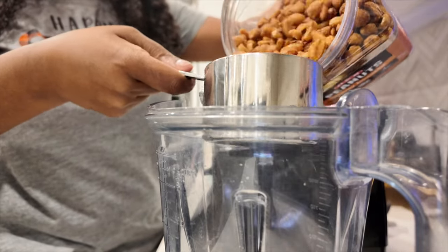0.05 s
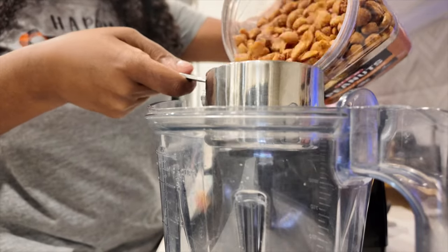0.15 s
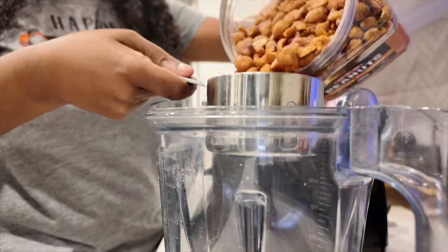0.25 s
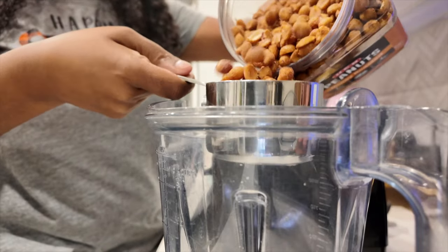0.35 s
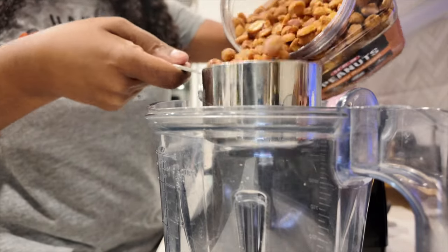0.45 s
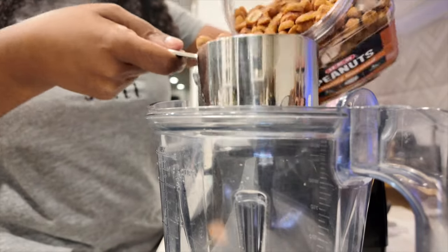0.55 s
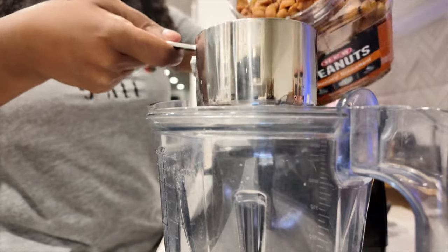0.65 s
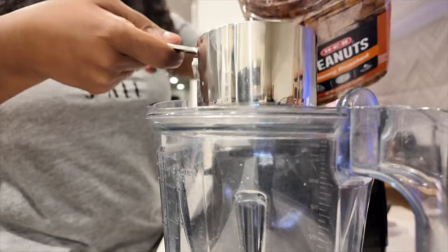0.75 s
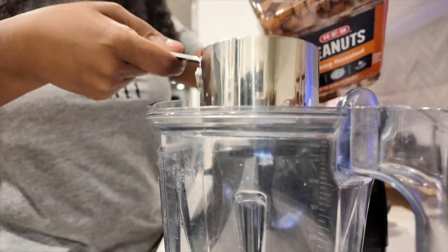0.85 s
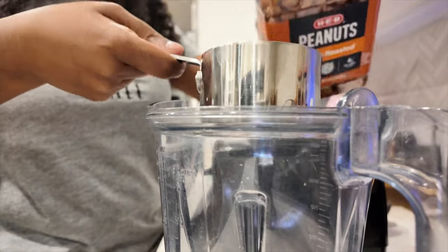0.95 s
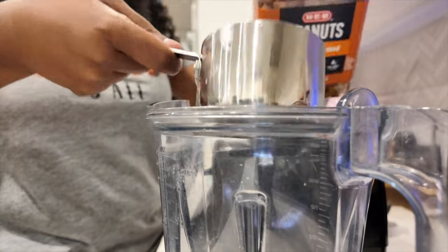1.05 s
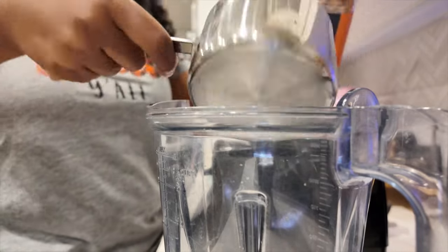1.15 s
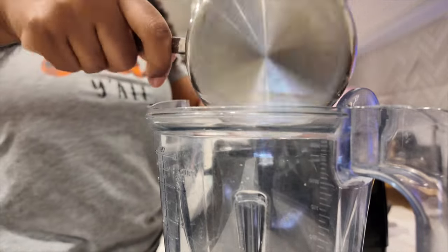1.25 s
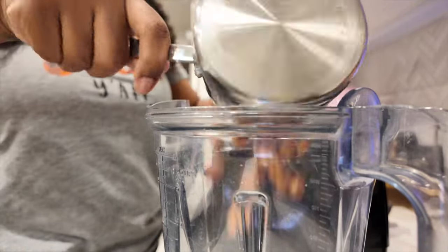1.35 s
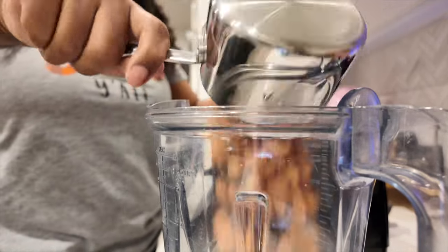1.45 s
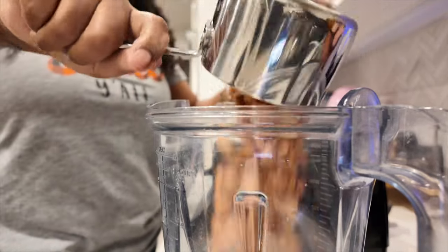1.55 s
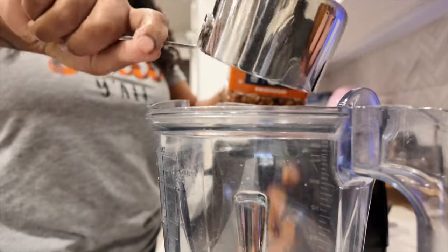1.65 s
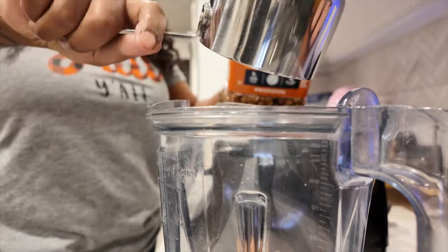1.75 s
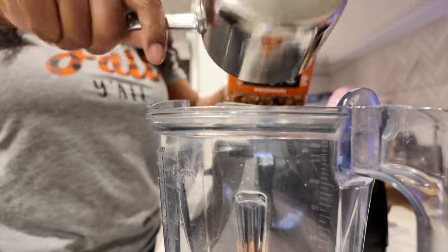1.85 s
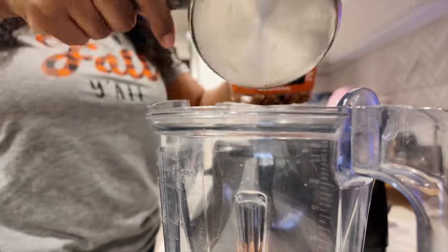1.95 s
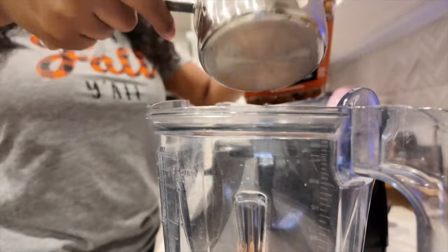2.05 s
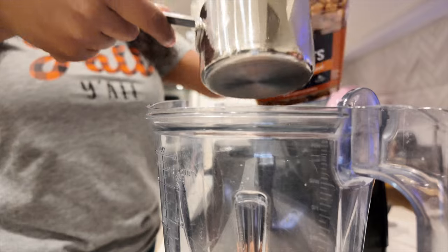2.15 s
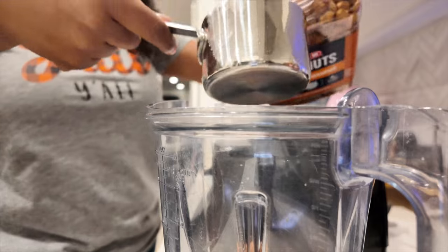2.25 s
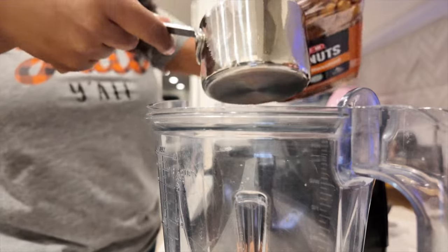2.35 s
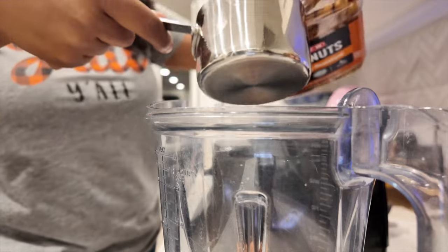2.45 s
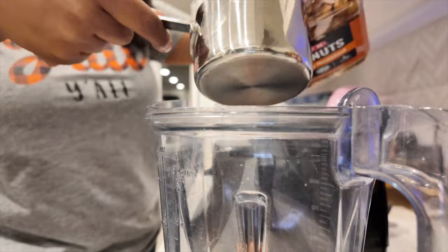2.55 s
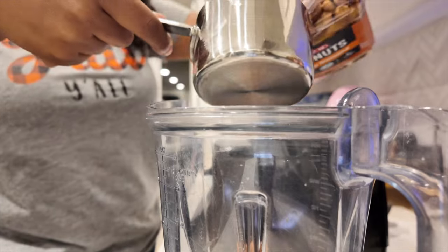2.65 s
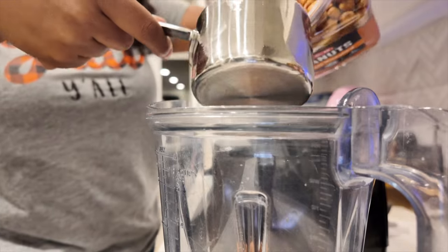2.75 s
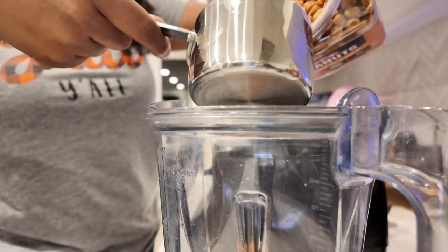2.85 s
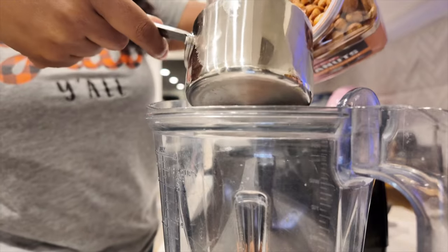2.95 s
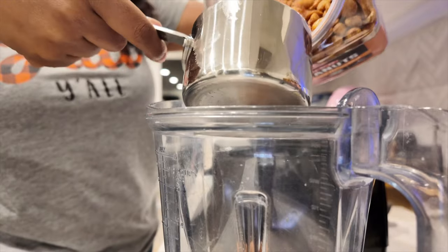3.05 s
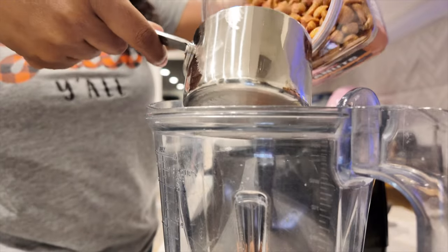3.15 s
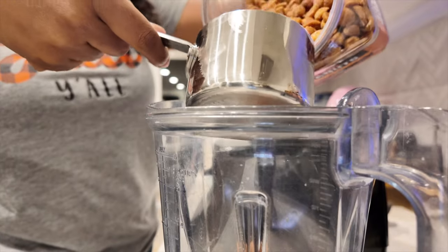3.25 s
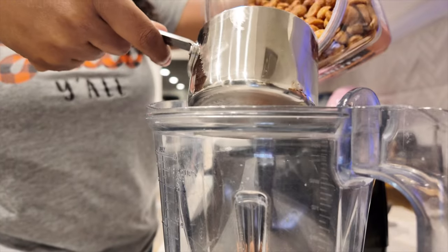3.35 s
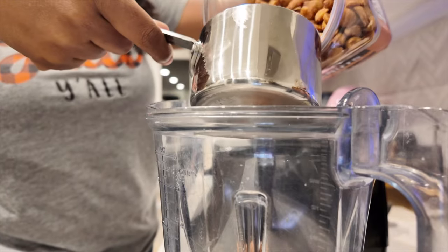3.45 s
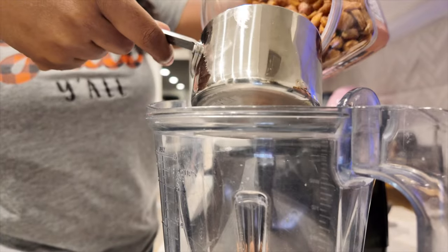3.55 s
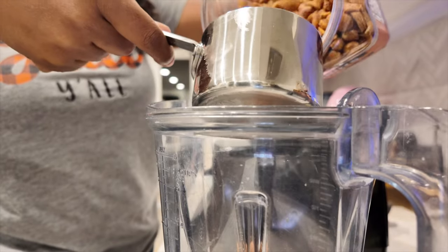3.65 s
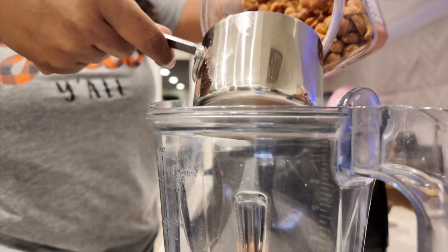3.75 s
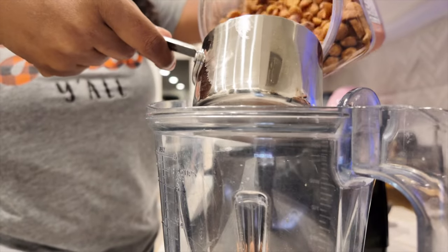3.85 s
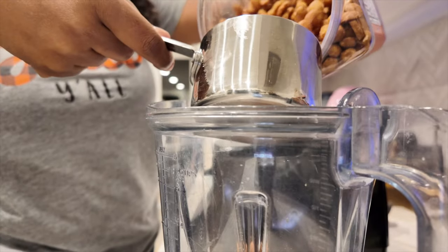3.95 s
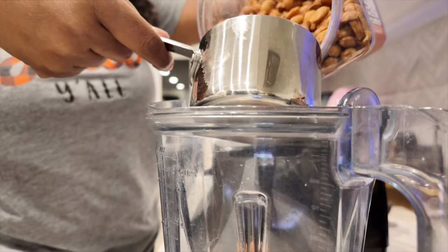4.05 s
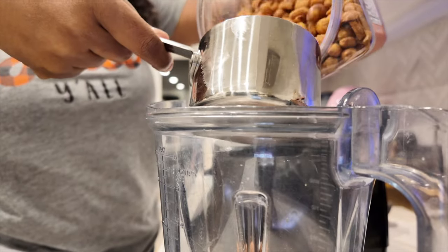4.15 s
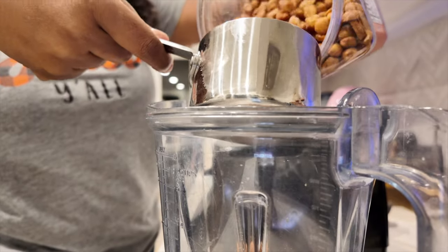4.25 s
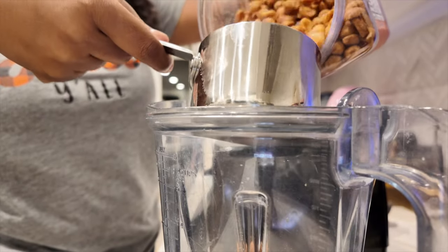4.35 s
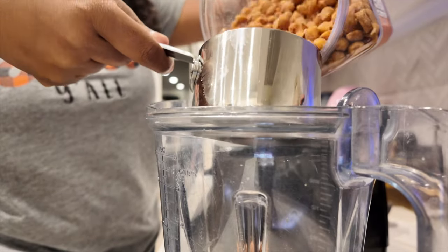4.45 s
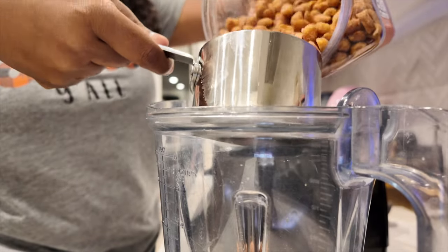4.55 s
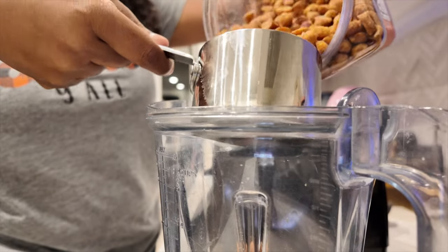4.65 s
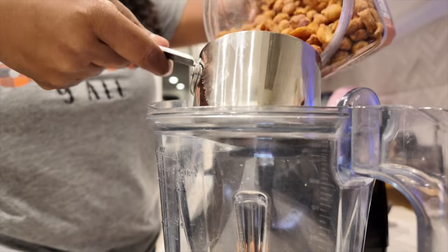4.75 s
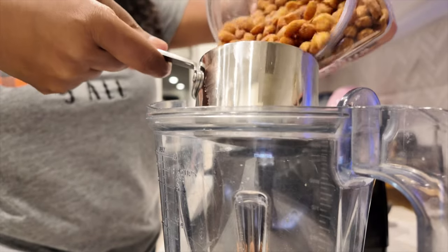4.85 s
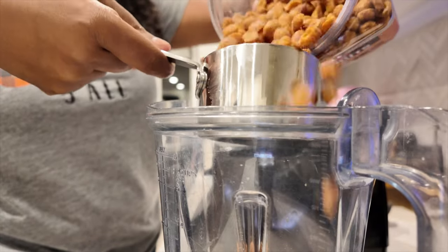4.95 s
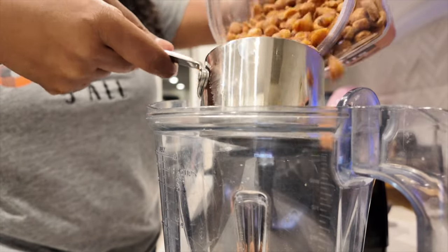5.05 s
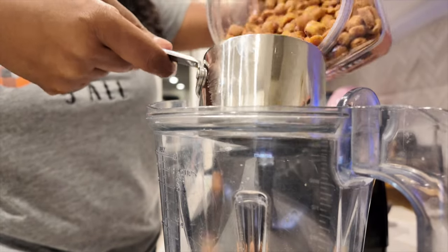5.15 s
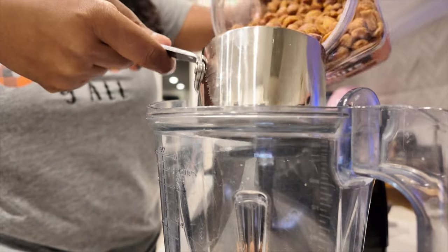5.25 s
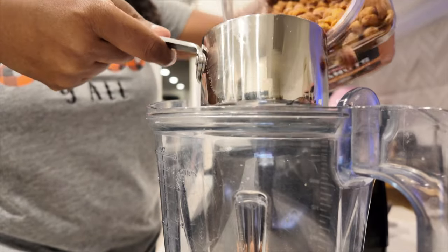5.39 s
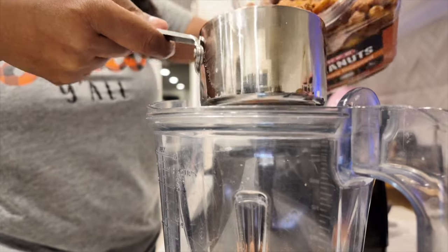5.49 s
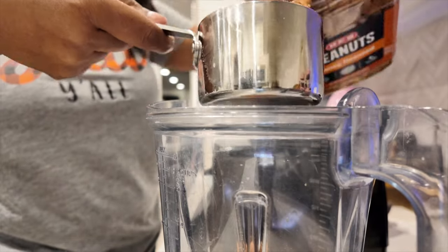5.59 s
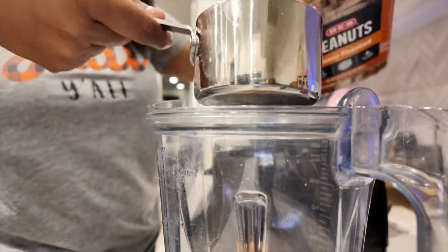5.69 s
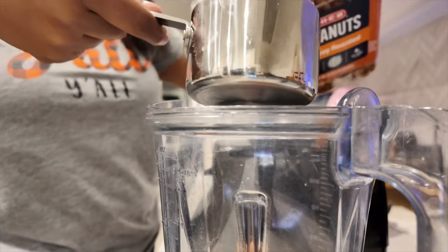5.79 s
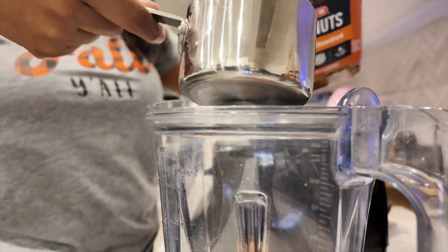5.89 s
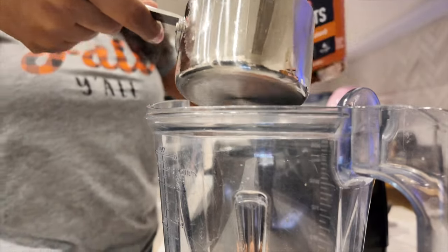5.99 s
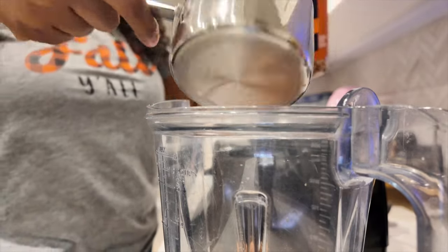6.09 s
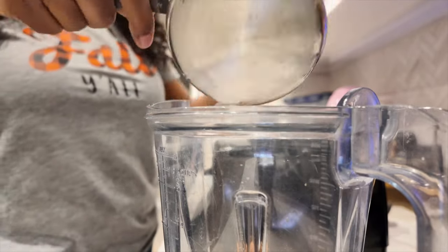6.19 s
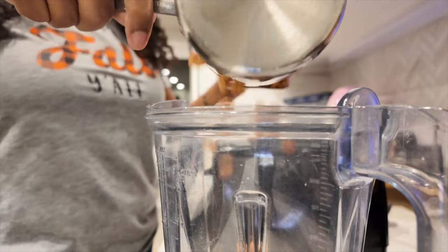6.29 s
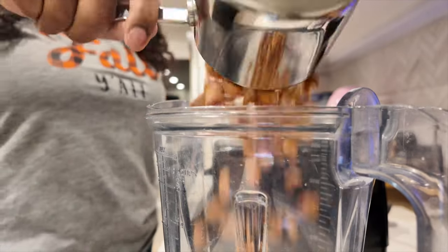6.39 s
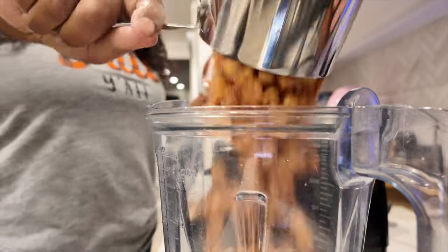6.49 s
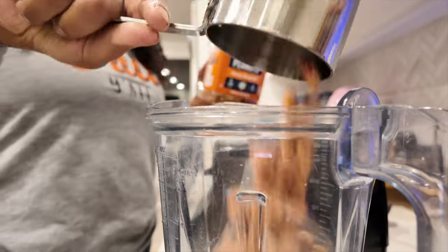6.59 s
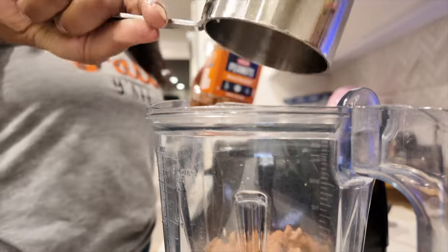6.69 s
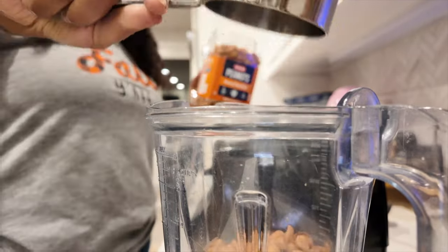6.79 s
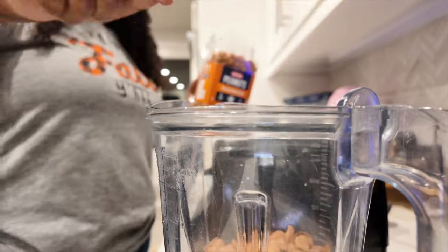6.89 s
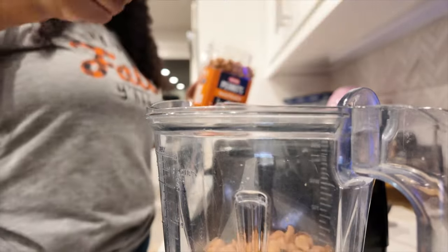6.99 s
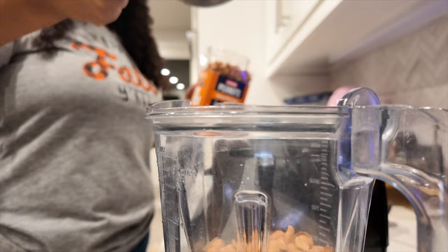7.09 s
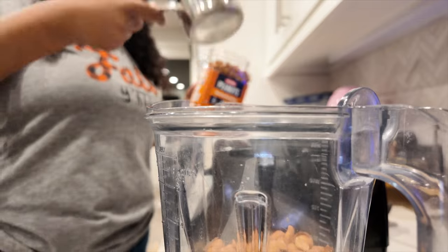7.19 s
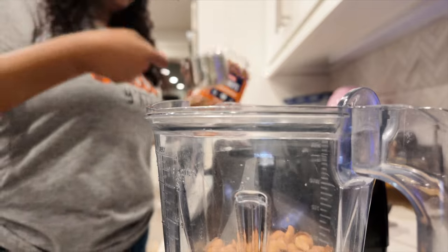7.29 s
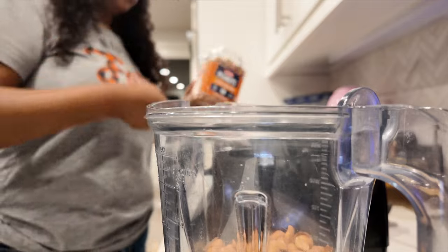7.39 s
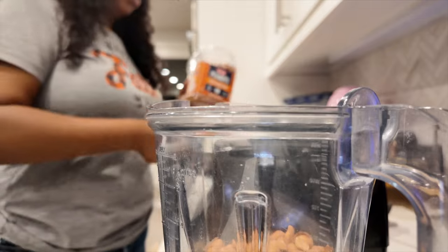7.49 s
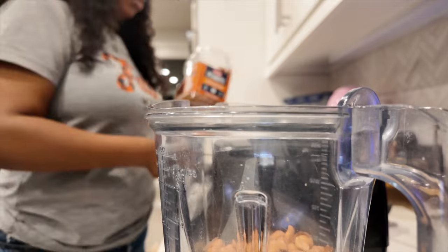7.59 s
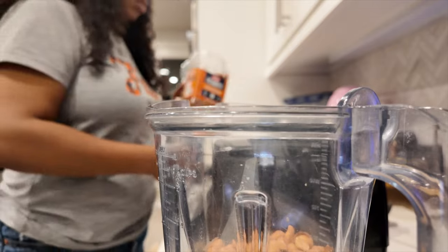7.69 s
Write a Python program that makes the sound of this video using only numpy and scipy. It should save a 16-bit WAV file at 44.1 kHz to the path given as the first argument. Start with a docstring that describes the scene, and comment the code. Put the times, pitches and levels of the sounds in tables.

```python
"""Peanuts rustle as they slide in a plastic tub and a steel cup, close to the microphones in a kitchen.
Stray nuts crack into a plastic blender jar, and two cupfuls clatter down through the jar's resonances.
Between them the cup is filled again: its first nuts ring it like a bell, then the load damps it.
At the end the tub is moved and its nuts shift. Contacts are noise bursts and decaying modes;
streams are random showers of such contacts, with their body and treble levelled separately."""
import sys
import numpy as np
from scipy import signal
from scipy.fft import rfft, irfft
from scipy.io import wavfile

SR = 44100
rng = np.random.default_rng(int(sys.argv[2]) if len(sys.argv) > 2 else 0)


def materialize(psi):
    """Save the field psi as 16-bit PCM at rate SR to the path in sys.argv[1].

    A 1-D psi becomes a single channel; in a 2-D psi each row is a channel.
    """
    bounded = np.clip(np.atleast_2d(psi).T, -1, 1)
    quanta = np.round(bounded * 32767).astype(np.int16)
    wavfile.write(sys.argv[1], SR, quanta)


N = 340893

# Event levels are set ahead of panning, the room and the microphone's rounding.
# Long run of nuts from tub to cup [t/s, level/dB before the slides' body and treble offsets]
FILL_FLOW = [(2.62, -70.5), (2.84, -56.5), (3.32, -50.5), (3.86, -49), (4.12, -43), (4.62, -47),
             (4.76, -51.5), (5.25, -45), (5.45, -65)]
# Short shakes of tub or full cup [start t/s, crest t/s, level/dB before the slides' offsets]
SHAKES_OF_NUTS = [(-0.4, 0.069, -46.5), (0.23, 0.326, -45.5), (0.393, 0.437, -47), (0.516, 0.694, -54),
                  (1.002, 1.142, -58.5), (5.523, 5.68, -55), (5.728, 5.839, -59.5)]
# Single nuts hitting the jar, alone or standing out of a cupful
# [t/s, peak level/dB, treble against body/dB, ring of the spot hit f/Hz]
JAR_DROPS = [(0.18, -14.5, -5.5, 1316), (0.222, -28.5, -32, 668), (0.283, -23.5, -21, 1240),
             (0.564, -19.5, -1.5, 2160), (1.484, -20, 1, 1720), (1.562, -7, -26, 1020),
             (1.623, -5, -5.5, 663), (1.666, -5.5, -5.5, 540), (1.708, -7, -7, 1080), (1.776, -13, 6, 1100),
             (1.786, -3, -14.5, 1003), (1.827, -13, -9.5, 1120), (1.92, -25, -21, 1100),
             (5.066, -15, -4, 700), (5.129, -12.5, -3.5, 1400), (5.153, -16.5, -11, 1320),
             (5.193, -16, -14, 1040), (5.25, -17.5, -9, 1680), (5.273, -17, -6, 1686),
             (5.571, -26.5, -31, 1020), (5.608, -12, -9.5, 1750), (5.919, -20.5, -4.5, 1150),
             (5.936, -19.5, -15, 676), (6.427, -8.5, -1.5, 660), (6.442, -12, -23, 508),
             (6.485, -12, -8, 1760), (6.588, -7, -3.5, 1107), (6.637, -3, -23, 1073), (6.68, -5, -5, 520),
             (6.731, -10.5, -3.5, 670)]
# Times when the cup is heaped and nuts rub its rim [from t/s, to t/s]
HEAPED_SPANS = [(0.28, 2.5), (4.781, 5.7)]
# Nuts skidding along the wall of the full cup
# [start t/s, length of the swell t/s (cut off after 1/3 s), level/dB, wall mode f/Hz]
WALL_SKIDS = [(1.349, 0.36, -38.5, 5720), (6.181, 0.21, -56, 5800), (6.474, 0.15, -33, 5750)]
# Knocks on the full cup [t/s, peak level/dB, wall mode f/Hz]
CUP_KNOCKS = [(0.4801, -16, 5970), (1.263, -31.5, 5700), (1.408, -17.5, 5680)]
# Dry clicks of nuts, cup and tub touching [t/s, peak level/dB, pitch f/Hz]
DRY_CLICKS = [(0.67, -13, 4100), (0.677, -13.5, 5500), (2.307, -25.5, 1093), (2.613, -42, 2200),
              (2.75, -33.5, 2040), (3.272, -15.5, 3740), (3.842, -23.5, 1980), (3.894, -25, 1250),
              (3.948, -27, 1320), (4.002, -22.5, 1850), (4.298, -21.5, 1360), (4.402, -22, 1265),
              (4.552, -27, 1140), (4.588, -25, 1680), (4.681, -24.5, 1170), (4.93, -24.5, 3900),
              (5.522, -28.5, 1310), (5.552, -31, 1460), (5.692, -28, 1230), (5.992, -32.5, 1160),
              (7.253, -44.5, 803.6), (7.535, -33, 1150)]
# Dull bumps of cup and tub being handled [t/s, peak level/dB, pitch f/Hz]
HANDLING_BUMPS = [(1.29, -30.5, 69.5), (1.384, -14, 297), (1.402, -14.5, 290), (1.429, -20, 146.4),
                  (2.303, -26.5, 197.6)]
# Cupfuls tipped into the jar [cup starts to tip t/s, first nuts land t/s, jar floor covered t/s,
# thickest flow t/s, body level/dB, treble level/dB, jar ring against crack/dB]
CUPFULS = [(1.223, 1.473, 1.567, 1.663, -16, -15, 4), (6.199, 6.504, 6.647, 6.67, -16.5, -19.5, 0.5)]
# Nuts landing on the wall of the filling cup [t/s, level/dB, hardness of the contact/dB]
WALL_PINGS = [(2.931, -23, -1.5), (3.0227, -15.5, -2.5), (3.0734, -13.5, -3.5), (3.1307, -9.5, -0.5),
              (3.1981, -12, -1), (3.254, -12.5, 1), (3.3871, -11, -6.5), (3.5079, -18, -0.5),
              (3.55, -23, 6.5), (3.678, -26.5, -6.5), (4.036, -23, -1), (4.16, -26, 9), (4.312, -23.5, 1.5)]
# Nuts shifting in the tub as it is moved [t/s, level/dB]
TUB_SHIFT = [(7.39, -75), (7.42, -55), (7.54, -30.5), (7.624, -38), (7.74, -36)]
# The load landing against the tub's side, so that its hollow booms [t/s, peak level/dB]
TUB_BOOMS = [(7.541, -33.5), (7.66, -40)]

# Modes of the empty steel cup [f/Hz, relative level/dB, t60/s, left minus right/dB]
CUP_MODES = [(2137, 1.5, 0.42, 2.5), (4162, -4, 0.38, -7.5), (6746, 6.5, 0.18, -5), (8110, -11, 0.85, 0),
             (9960, -4, 0.15, -5.5), (11740, -9, 0.18, -3), (14030, -20.5, 0.19, -3)]
# The cup's flat floor, which only clacks [f/Hz, width/Hz, relative level/dB]
CUP_FLOOR_MODES = [(1720, 170, -2.5), (2730, 53, -7)]
# The same cup damped by its load [f/Hz, width/Hz, relative level/dB]
FULL_CUP_MODES = [(4230, 70, 1), (8160, 70, 1), (10000, 120, -7), (12000, 150, -7)]
# Plastic blender jar [f/Hz, width/Hz, relative level/dB]
JAR_MODES = [(153, 3.6, -17), (509, 25, 0.5), (674.3, 23.7, 5), (804, 33, -4.5), (1010, 11, -1.5),
             (1114, 52, 5), (1257, 39, -6.5), (1764, 34, 1.5), (2776, 25, -13), (3530, 85, -1.5),
             (4570, 90, -10)]
# Plastic tub [f/Hz, width/Hz, relative level/dB]
TUB_MODES = [(317, 26, -7.5), (542, 77, 0.5), (1080, 270, 6.5), (1770, 140, 5.5)]

# Colour of a nut cracking on the jar [f/Hz, level/dB]
CRACK_COLOUR = [(60, -38), (340, -23.5), (500, 14), (900, -21.5), (1400, 4.5), (4300, 1), (6500, -8),
                (15500, -19.5)]
# Colour of nut brushing nut [f/Hz, level/dB]
RUSTLE_COLOUR = [(60, -20.5), (160, -16.5), (235, 0.5), (350, -4), (440, 5), (720, -10.5), (1280, -1.5),
                 (2200, -6), (4300, -10.5), (5300, -16), (16000, -24.5)]
# Colour of a light dry contact [f/Hz, level/dB]
CLICK_COLOUR = [(80, -32.5), (300, -16.5), (850, -14), (1300, -6), (5000, -1.5), (15500, -18)]
# Colour of the quiet room [f/Hz, level/dB]
ROOM_COLOUR = [(25, -10), (92, 3), (344, -9), (451, 4), (950, -11), (2760, -15), (16000, -36.5)]
# Spread between the two microphones [f/Hz, side minus mid level/dB]
MIC_WIDTH = [(60, -24.5), (900, -7), (2500, -6), (10000, 1.5)]
# Kitchen reverberation [f/Hz, t60/s]
KITCHEN_DECAY = [(150, 0.24), (600, 0.25), (3000, 0.31), (12000, 0.45)]

ROOM_TONE_DB = -62
TOP_HZ = 16000
CONTACT_S = 0.0008  # a nut is soft: time constant with which its push builds
TIME = np.arange(N) / SR
RING_TIME = TIME[:SR // 3]
KNOCK_TIME = TIME[:SR // 7]
# a cupful swells to its thickest, then the heap settles; the treble dies first
POUR_RISE_DB, POUR_FALL_DB_PER_S = 5.5, 102.5
TREBLE_RISE_DB, TREBLE_FALL_DB_PER_S = 17, 114.5
# nuts creep faster and faster in the tipping cup until it has emptied
CREEP_DB, CREEP_RISE_DB = -41, 21.5  # level before the slides' offsets, rise to the crest
EMPTYING_S = 0.046  # after the first nuts land
# any load starts to move quickly and comes to rest more slowly
START_DB_PER_S, SETTLE_DB_PER_S = 708.5, 112
SHAKE_RISE_DB = 8.5
# when the cup's floor is covered and its wall buried, and how gradually
FLOOR_COVERED_S, WALL_BURIED_S, COVERING_S = 3.42, 4.4, 0.092
FULL_RING_SHARE = 0.12  # of the empty cup's ring time


def undb(db):
    """Decibels to gain."""
    return 10 ** (np.asarray(db) / 20)


def unit(x):
    """Scale to rms 1."""
    return x / np.sqrt(np.mean(x ** 2))


def peak_at(x, db):
    """Scale to a peak level in dB."""
    return undb(db) * x / np.abs(x).max()


def fade(t, t60):
    """Exponential decay by 60 dB in t60."""
    return np.exp(-np.log(1000) * t / t60)


def contact_push(t60):
    """A soft contact's force builds quickly and dies away."""
    return (1 - np.exp(-KNOCK_TIME / CONTACT_S)) * fade(KNOCK_TIME, t60)


def pan(db):
    """Channel gains for a left minus right level."""
    return undb(np.array([[db], [-db]]) / 2)


def add(track, s, sound):
    """Mix a sound into a track at time s."""
    start = max(int(s * SR), 0)
    track[:, start:start + sound.shape[1]] += sound[:, :N - start]


def at_hz(points, hz):
    """Read (Hz, value) points on a log-frequency axis."""
    f, value = np.transpose(points)
    return np.interp(np.log(hz + 1), np.log(f), value)


def colour(x, points, size=2048):
    """Causal filter with the given (Hz, dB) response, made minimum-phase by folding its cepstrum."""
    gain = undb(at_hz(points, np.fft.rfftfreq(size, 1 / SR)))
    cepstrum = irfft(np.log(gain))
    cepstrum[1:size // 2] *= 2
    cepstrum[size // 2 + 1:] = 0
    response = irfft(np.exp(rfft(cepstrum)))
    return signal.oaconvolve(x, response[None], axes=1)[:, :x.shape[1]]


def band(x, hz, kind, order=2):
    """Butterworth filter."""
    sos = signal.butter(order, np.minimum(hz, TOP_HZ), kind, fs=SR, output="sos")
    return signal.sosfilt(sos, x)


def octave(x, hz, order=2):
    """The octave band centred on hz."""
    return band(x, [hz / np.sqrt(2), hz * np.sqrt(2)], "band", order)


def split(x):
    """Body and treble of a sound."""
    edge_hz = 2500
    return band(x, edge_hz, "low", order=3), band(x, edge_hz, "high", order=3)


def stereo_noise(count):
    """Noise that is alike at both microphones in the bass and drifts apart in the treble."""
    mid, side = rng.standard_normal((2, 1, count))
    return mid + colour(side, MIC_WIDTH) * np.array([[1], [-1]])


def curve(rows):
    """Columns of (s, ..) rows, sample by sample from the first row to the last."""
    s, *columns = np.transpose(rows)
    t = np.arange(s[0], s[-1], 1 / SR)
    return [np.interp(t, s, column) for column in columns]


def crack(points, t60):
    """The brief coloured burst of one contact."""
    burst = stereo_noise(len(KNOCK_TIME)) * contact_push(t60)
    return unit(colour(burst, points))


def ring(modes, lobe=0.41):
    """Resonances struck at a random place; their lobes reach the two microphones out of step."""
    out = 0
    for k, (hz, width, db) in enumerate(modes):
        strength, detune, side = rng.standard_normal(3)
        lead = lobe * (-1) ** k * min(hz / 1000, 1)
        lead = lead + side * undb(at_hz(MIC_WIDTH, hz)) / 2
        phase = rng.choice([0, np.pi]) + lead * np.array([[1], [-1]])
        mode_hz = hz + 0.29 * width * detune
        swing = np.sin(2 * np.pi * mode_hz * KNOCK_TIME + phase)
        decay = np.exp(-np.pi * width * KNOCK_TIME)
        # the root of the width offsets the smaller energy of a short ring
        out = out + undb(db + 6.4 * strength) * np.sqrt(width) * decay * swing
    return unit(out)


def shower(knock, n, per_s, scatter_db, count=16):
    """n samples of contacts of unequal force at random times, shared among count places; rms 1."""
    places = [knock() for _ in range(count)]
    chance, force, sign = rng.random((3, n))
    out = np.zeros((2, n + len(KNOCK_TIME)))
    for i in np.flatnonzero(chance < per_s / SR):
        gain = np.sign(sign[i] - .5) * undb(scatter_db * force[i] ** 2)
        out[:, i:i + len(KNOCK_TIME)] += gain * places[i % count]
    return unit(out[:, :n])


def flow(stream, s, body_db, treble_db):
    """Play a shower from time s with its body and treble at the given levels."""
    body, treble = map(unit, split(stream))
    n = stream.shape[1]
    soft_ends = signal.windows.tukey(n, SR / 50 / n)
    out = np.zeros((2, N))
    add(out, s, (undb(body_db) * body + undb(treble_db) * treble) * soft_ends)
    return out


def swell(t, start_s, crest_s, rise_db, fall_db_per_s):
    """Level in dB below the crest of a load that starts to move, gathers pace and comes to rest."""
    before_start = START_DB_PER_S * np.maximum(start_s - t, 0)
    rising = np.interp(t, [start_s, crest_s], [-rise_db, 0]) - before_start
    return np.maximum(rising - fall_db_per_s * np.maximum(t - crest_s, 0), -120)


def feed_db():
    """Level of the nuts set moving by the shakes and the long fill."""
    s, db = np.transpose(FILL_FLOW)
    fill = np.interp(TIME, s, db) + swell(TIME, s[0], s[-1], 0, SETTLE_DB_PER_S)
    shakes = [level + swell(TIME, start, crest, SHAKE_RISE_DB, SETTLE_DB_PER_S)
              for start, crest, level in SHAKES_OF_NUTS]
    return np.max([fill, *shakes], axis=0)


def creep_db():
    """Level of the nuts creeping towards the lip as the cup tips, until the last have left it."""
    tips = [swell(TIME, tip, land + EMPTYING_S, CREEP_RISE_DB, SETTLE_DB_PER_S)
            for tip, land, *_ in CUPFULS]
    return CREEP_DB + np.max(tips, axis=0)


def nut_tick():
    """One nut brushing another: a dry crack and a short ring whose pitch depends on the nut."""
    hz = 1300 * 2 ** (2 * rng.random() ** 2)
    return crack(RUSTLE_COLOUR, t60=.028) + undb(-4) * ring([(hz, hz / 10, 0)])


def nut_knock(middle_hz=1300):
    """A whole nut falls on the heap: a short woody knock, pitched by the nut's size."""
    hz = middle_hz * 2 ** (rng.standard_normal() / 4)
    return ring([(hz, hz / 10, 0)])


def slides(db, body_db=4, treble_db=8.0, brightening=0.46, knock_db=-5.5):
    """Dense nut-on-nut contacts with a few hollow knocks; faster nuts meet harder and sound brighter."""
    ticks = shower(nut_tick, N, per_s=1200, scatter_db=16, count=32)
    knocks = shower(nut_knock, N, per_s=45, scatter_db=8)
    stream = ticks + undb(knock_db) * knocks
    bright_db = brightening * (db - db.max())
    return flow(stream, 0, db + body_db, db + treble_db + bright_db) * pan(-1.8)


def drops(count=2, bounce_db=-9, flight_s=.01, ring_db=-4, spot_db=-1, damping_hz=5200):
    """Single nuts crack on the jar, ring it, most of all at the spot they hit, and bounce once."""
    out = np.zeros((2, N))
    for s, db, bright_db, hz in JAR_DROPS:
        for bounce in range(count):
            spot = ring([(hz, hz / 16, 0)])
            hit = crack(CRACK_COLOUR, t60=0.039) + undb(ring_db) * ring(JAR_MODES) + undb(spot_db) * spot
            body, _ = split(hit)
            _, treble = split(crack(CRACK_COLOUR, t60=0.035))
            knock = unit(body) + undb(bright_db) * unit(band(treble, damping_hz, "low"))
            add(out, s, peak_at(knock, db + bounce_db * bounce))
            s = s + flight_s * (.5 + rng.random())
    return out * pan(-0.45)


def loaded_cup(wall_hz):
    """The full cup's short ring, with one wall mode set by the weight of nuts leaning on it."""
    return ring(FULL_CUP_MODES + [(wall_hz, 55, 3)])


def scrapes(feed, rim_db=-9):
    """Nuts catch on the rim of the heaped cup and skid along its wall; its high modes glint."""
    heaped = sum((TIME > start) & (TIME < end) for start, end in HEAPED_SPANS)
    rim_hz = CUP_KNOCKS[0][2]
    catching = shower(lambda: loaded_cup(rim_hz), N, per_s=90, scatter_db=8, count=4)
    out = heaped * undb(feed + rim_db) * catching
    for s, length, db, hz in WALL_SKIDS:
        def contact():
            """One touch of the wall, its pitch a little different each time."""
            return loaded_cup(hz * (1 + .015 * rng.standard_normal()))

        skid = shower(contact, len(RING_TIME), per_s=600, scatter_db=5, count=10)
        envelope = np.sqrt(np.abs(np.sin(np.pi * np.minimum(RING_TIME / length, 1))))
        add(out, s, undb(db) * skid * envelope)
    return out


def tinks(base_db=-5, tick_db=-9):
    """The loaded cup, knocked, gives only a short metallic tink."""
    out = np.zeros((2, N))
    for s, db, hz in CUP_KNOCKS:
        floor = undb(base_db) * ring(CUP_FLOOR_MODES)
        tick = undb(tick_db) * crack(CLICK_COLOUR, t60=0.11)
        add(out, s, peak_at(loaded_cup(hz) + floor + tick, db))
    return out * pan(-2.7)


def clicks(ring_db=0, burst_db=-8):
    """Light dry contacts, each with a short ring at its own pitch."""
    out = np.zeros((2, N))
    for s, db, hz in DRY_CLICKS:
        burst = crack(CLICK_COLOUR, t60=.05)
        body = unit(octave(burst, hz, order=1))
        click = body + undb(ring_db) * ring([(hz, hz / 10, 0)]) + undb(burst_db) * burst
        add(out, s, peak_at(click, db))
    return out * pan(-2)


def bumps(rattle_db=0, rattle_top=1.9):
    """Soft blows: one low, quickly damped swing with a dull rattle reaching rattle_top times its pitch."""
    out = np.zeros((2, N))
    for s, db, hz in HANDLING_BUMPS:
        swing = unit(np.sin(2 * np.pi * hz * KNOCK_TIME) * fade(KNOCK_TIME, .1))
        burst = stereo_noise(len(KNOCK_TIME)) * fade(KNOCK_TIME, 0.11)
        rattle = unit(band(burst, [55, hz * rattle_top], "band"))
        add(out, s, peak_at(swing + undb(rattle_db) * rattle, db))
    return out


def pour(land_s, covered_s, crest_s, db, treble_db, ring_db):
    """A cupful rains on the jar's floor and blades; it turns dull once nuts land on nuts."""
    t = land_s + TIME[:SR]

    def knock():
        """One nut cracks on the plastic and rings the jar."""
        return crack(CRACK_COLOUR, t60=.022) + undb(ring_db) * ring(JAR_MODES)

    stream = shower(knock, len(t), per_s=520, scatter_db=10.5)
    body = db + swell(t, land_s, crest_s, POUR_RISE_DB, POUR_FALL_DB_PER_S)
    treble = treble_db + swell(t, land_s, covered_s, TREBLE_RISE_DB, TREBLE_FALL_DB_PER_S)
    return flow(stream, land_s, body, treble) * pan(-.6)


def pours():
    """The first cupful meets bare plastic; the second lands on nuts, which muffle the jar."""
    return sum(pour(*row[1:]) for row in CUPFULS)


def uncovered(s, covered_s):
    """Share of a part of the cup that is still bare at time s."""
    return .5 - .5 * np.tanh((s - covered_s) / COVERING_S / 2)


def cup_ring(s, struck_db, split_hz=16, twin_db=-7, pull=0.028, scatter=0.001):
    """The cup struck at time s, its first, second and upper modes levelled; the load shortens the ring."""
    bare = uncovered(s, FLOOR_COVERED_S)
    ring_share = FULL_RING_SHARE + (1 - FULL_RING_SHARE) * bare
    out = 0
    for k, (hz, db, t60, pan_db) in enumerate(CUP_MODES):
        load, twin, side = rng.standard_normal(3)
        # nuts packed against the wall pull each mode sharp, a little differently at every hit
        sharp = 1 + scatter * load + pull * (1 - bare) ** 6 * (1 + load / 2)
        phase = 2 * np.pi * hz * sharp * RING_TIME + .5 * side * np.array([[1], [-1]])
        # the handle splits each mode above the first into close twins, so the ring swells and beats
        beat = 2 * np.pi * split_hz * hz / CUP_MODES[0][0] * (1 + 0.5 * twin) * RING_TIME
        tone = np.sin(phase) - min(k, 1) * undb(twin_db) * np.sin(phase + beat)
        gain = undb(struck_db[min(k, 2)] + db) * pan(pan_db)
        out = out + gain * tone * fade(RING_TIME, t60 * ring_share)
    return out


def pings(first_db=-11, upper_db=-11, tick_db=-7, tick_low_hz=1200):
    """Nuts strike the cup like a bell, more briefly as it fills; hard contacts favour the upper modes."""
    out = np.zeros((2, N))
    for s, db, hard_db in WALL_PINGS:
        # a soft contact favours the first mode and the floor
        add(out, s, cup_ring(s, [db + first_db - hard_db, db, db + upper_db + hard_db]))
        tick = crack(CLICK_COLOUR, t60=.06) + ring(CUP_FLOOR_MODES)
        tick = band(tick, tick_low_hz, "high")
        add(out, s, peak_at(tick, db + tick_db - hard_db / 2))
    return band(out, tick_low_hz, "high")


def tinkle(feed, first_db=-5, second_db=16, upper_db=0, scatter_db=6.5, count=56):
    """More nuts bounce against the wall as hard as the flow drives them, until the wall is buried."""
    out = np.zeros((2, N))
    span = [WALL_PINGS[1][0], WALL_BURIED_S + 2 * COVERING_S]
    for k, (when, *force) in enumerate(rng.standard_normal((count, 4))):
        s = np.interp(k + when, [0, count], span)
        mode_db = np.array([first_db, second_db, upper_db])
        struck_db = feed[int(s * SR)] + mode_db + scatter_db * np.array(force)
        add(out, s, uncovered(s, WALL_BURIED_S) * cup_ring(s, struck_db))
    return out


def shift(treble_db=-7.5):
    """The load slumps in the tub and sounds its hollow walls."""
    db, = curve(TUB_SHIFT)

    def knock():
        """One nut rustles and rings the tub."""
        return crack(RUSTLE_COLOUR, t60=0.036) + undb(1.0) * ring(TUB_MODES)

    stream = shower(knock, len(db), per_s=500, scatter_db=5.5)
    stream = band(stream, [290, 9000], "band")
    return flow(stream, TUB_SHIFT[0][0], db, db + treble_db) * pan(-1.2)


def booms(hz=388, t60=0.23, attack_s=0.012):
    """The air in the tub swells at one low pitch and dies away."""
    out = np.zeros((2, N))
    envelope = (1 - np.exp(-RING_TIME / attack_s)) * fade(RING_TIME, t60)
    tone = envelope / envelope.max() * np.sin(2 * np.pi * hz * RING_TIME)
    for s, db in TUB_BOOMS:
        add(out, s, undb(db) * pan(-0.5) * tone)
    return out


def kitchen(x, wet_db=-11, first_s=0.0029, count=9):
    """Hard walls and cupboards return a diffuse tail, each octave with its own decay."""
    t = TIME[:SR]
    noise = stereo_noise(SR)
    centres = TOP_HZ / np.sqrt(2) / 2. ** np.arange(count)
    tail = sum(octave(noise, hz) * fade(t, at_hz(KITCHEN_DECAY, hz)) for hz in centres)
    # silent up to first_s, then rising to full over as long again
    tail = band(tail, 3300, "low", order=1) * np.clip(t / first_s - 1, 0, 1)
    return undb(wet_db) * signal.oaconvolve(x, unit(tail) / np.sqrt(SR), axes=1)[:, :N]


def scene():
    """Nuts, cup and jar with their echo, and the quiet room; the low handling bumps,
    close to the microphones, are heard dry."""
    feed, creep = feed_db(), creep_db()
    nuts = slides(np.maximum(feed, creep)) + shift() + booms() + clicks()
    cup = pings() + tinkle(feed) + tinks() + scrapes(feed)
    jar = pours() + drops()
    near = nuts + cup + jar
    room_tone = undb(ROOM_TONE_DB) * unit(colour(stereo_noise(N), ROOM_COLOUR))
    return near + bumps() + kitchen(near) + room_tone


def record(dry):
    """The phone's microphones drop the deep bass, round the loudest peaks and cut the top."""
    rounded = np.tanh(band(dry, 67, "high", order=3))
    return signal.sosfilt(signal.ellip(8, .2, 70, TOP_HZ, fs=SR, output="sos"), rounded)


dry = scene()
out = record(dry)
materialize(out)
```